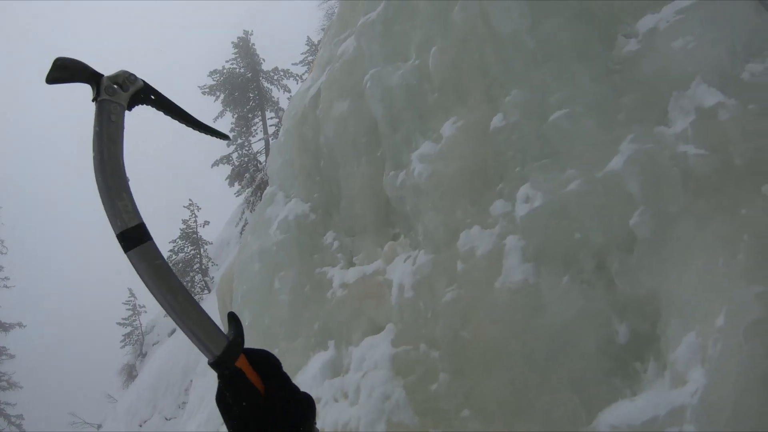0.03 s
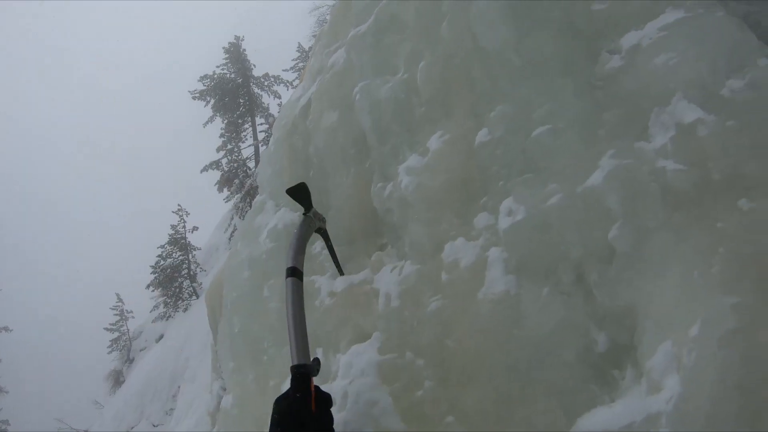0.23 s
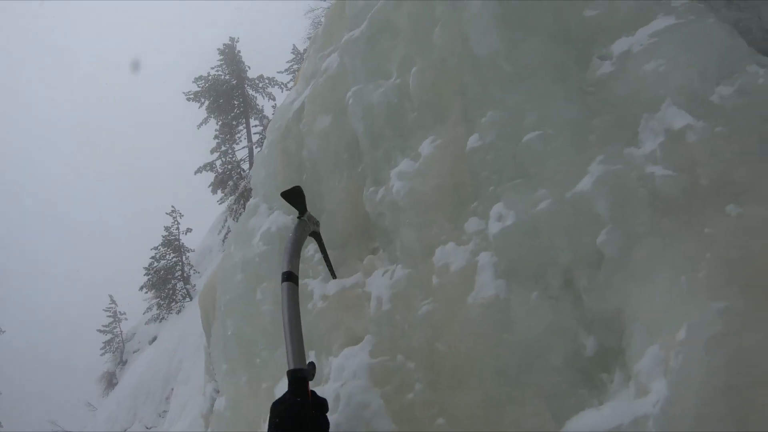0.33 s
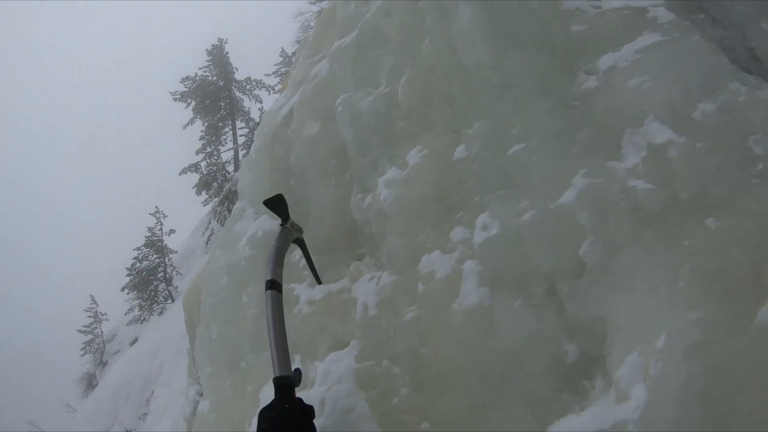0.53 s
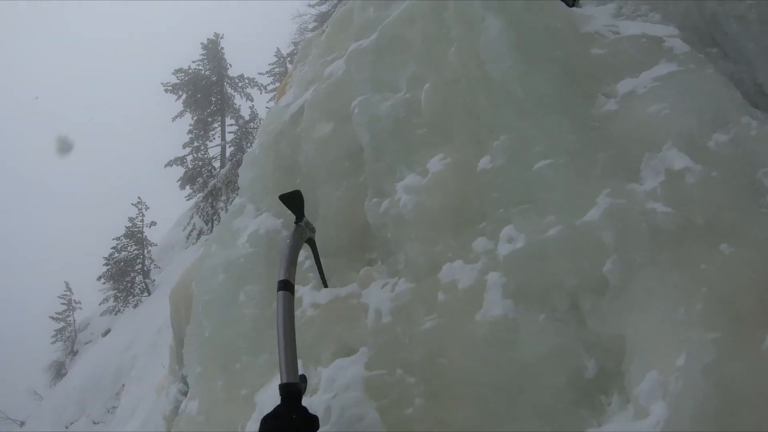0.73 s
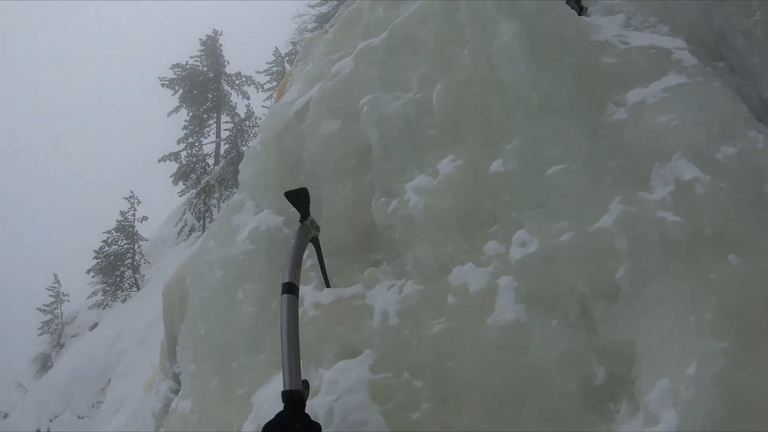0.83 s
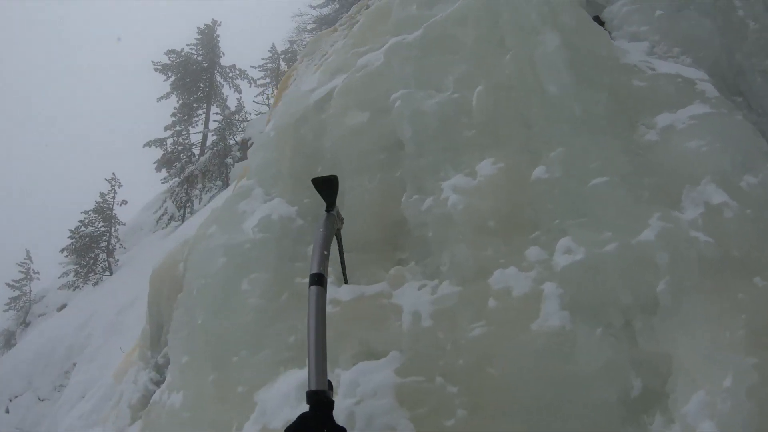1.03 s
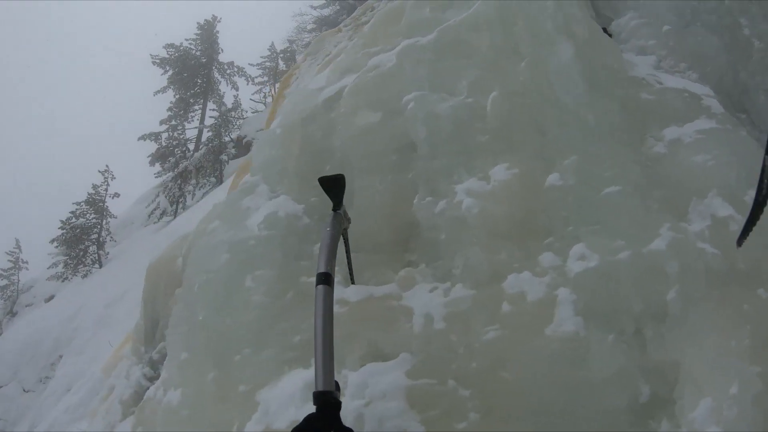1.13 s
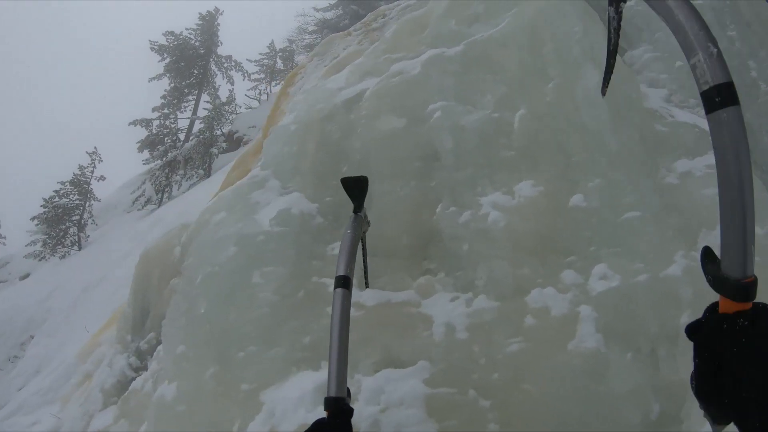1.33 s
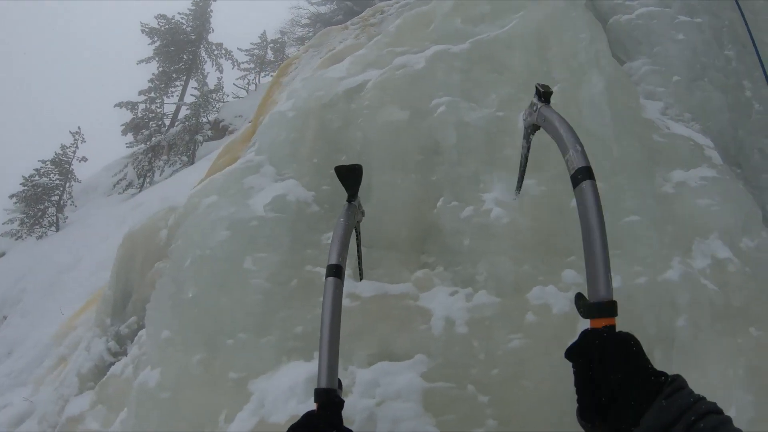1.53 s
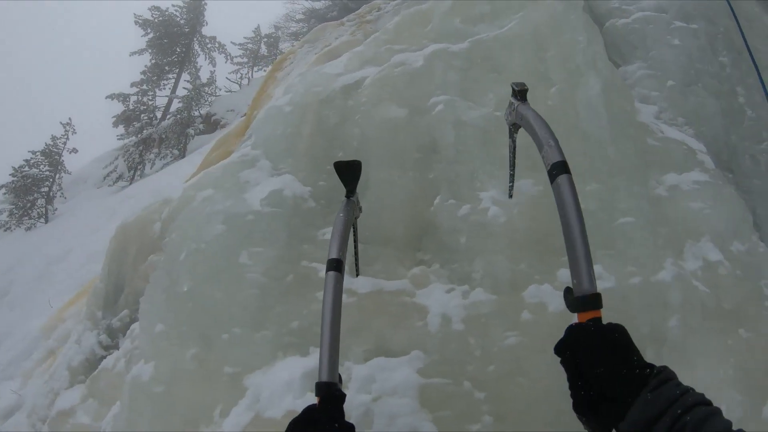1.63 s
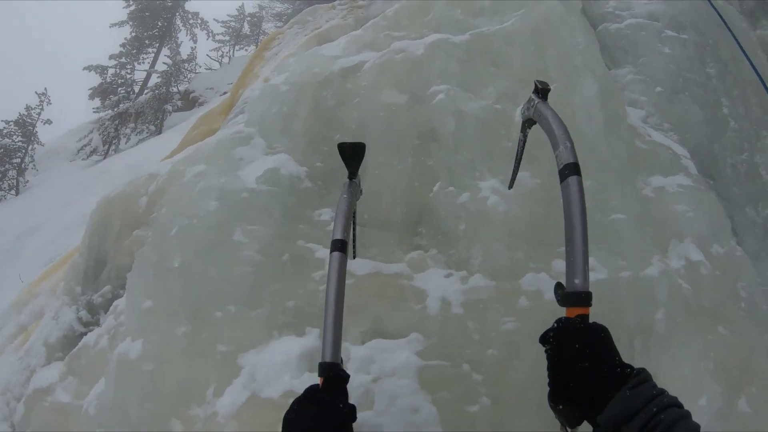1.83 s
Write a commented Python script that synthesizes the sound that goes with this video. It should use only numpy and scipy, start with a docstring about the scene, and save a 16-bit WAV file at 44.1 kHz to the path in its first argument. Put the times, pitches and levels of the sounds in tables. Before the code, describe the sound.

Two ice axes strike a frozen wall outdoors, an arm's length away. The first crunches in with a thud, the ice crackles faintly and clothing rustles softly, then the second bites with a brief steel ring.

```python
"""Two ice axes in a frozen waterfall

A climber plants two axes, an arm's length away. The left pick crunches in through several fractures;
the right one bites at once and its steel rings briefly. Each time, the wall thuds and booms as the
shaft stops, and crushed ice settles. Between the blows the ice crackles under the loaded pick,
shifts of weight knock softly, and stiff clothing rustles with each move."""
import sys
import numpy as np
from scipy import signal
from scipy.fft import rfft, irfft
from scipy.io import wavfile
from scipy.ndimage import uniform_filter1d

SR = 44100
rng = np.random.default_rng(int(sys.argv[2]) if len(sys.argv) > 2 else 0)


def generate_wav(sig):
    """Save sig (samples, or channels by samples) to the path in sys.argv[1] as 16-bit PCM at SR."""
    pcm = np.round(np.clip(np.atleast_2d(sig).T, -1, 1) * 32767).astype(np.int16)
    wavfile.write(sys.argv[1], SR, pcm)


N = 83790

# tone of the still air, the rubbing cloth and its hiss (frequency [Hz], level [dB])
AIR_TONE = [(15, -7), (40, -5), (90, -14.5), (300, -19.5), (2000, -30), (15000, -45.5)]
RUB_TONE = [(30, -24.5), (90, -23.5), (170, -0.5), (450, -0.5), (900, -0.5), (1700, 2.5), (2600, -0.5),
            (3400, -0.5), (4500, -13), (8000, -30), (15000, -39.5)]
HISS_TONE = [(100, -38.5), (1500, -13), (3300, -3.5), (5000, -1.5), (7300, 4.5), (9200, 0), (10500, -18),
             (14000, -21), (16000, -36)]
# how loud the clothing is (time [s], rub level [dB], hiss level [dB])
RUSTLE_LEVELS = [(0, -63, -64), (.1, -66.5, -66), (0.212, -71, -69.5), (0.23, -47, -60), (.30, -70, -70.5),
                 (.345, -78.5, -68), (.41, -64.5, -62.5), (.48, -71.5, -66), (.68, -72, -66),
                 (0.744, -62, -58), (.785, -72, -65.5), (.87, -69, -65), (0.949, -69, -63.5),
                 (0.999, -77.5, -74.5), (1.131, -79, -69.5), (1.179, -68.5, -69.5), (1.271, -63, -65),
                 (1.319, -70.5, -72.5), (1.429, -69, -65), (1.49, -75.5, -70), (1.552, -74, -65),
                 (1.587, -52.5, -71.5), (1.64, -81.5, -70), (1.699, -77.5, -76), (1.724, -68.5, -62),
                 (1.77, -60.5, -63), (1.82, -71, -71.5), (1.87, -77, -72.5), (1.9, -69, -69.5)]
# a sleeve drags (peak time [s], half length [s], level [dB], pitch [Hz], resonance width [Hz])
SLEEVE_DRAGS = [(0.888, 0.053, -75, 214, 60), (1.312, 0.066, -74, 185, 70), (1.43, 0.052, -68, 2900, 900),
                (1.54, 0.03, -70.5, 3480, 500), (1.797, 0.038, -67.5, 321, 90)]

# knocks: weight shifts, crushed ice settles, the wall takes a blow and then shudders
# (time [s], length [s], level [dB], fade time [s])
WEIGHT_BUMPS = [(.457, 0.0077, -67.5, 0.0027), (.555, .006, -65, 0.0072), (.611, 0.013, -62.5, 0.0062),
                (.72, 0.0059, -66, 0.0072), (1.362, 0.0098, -62, 0.0087), (1.884, .012, -67, 0.0062)]
GRIT_BURSTS = [(.253, 0.023, -46, 0.0049), (1.598, 0.0014, -37.5, 0.0045), (1.61, 0.0024, -72, 0.027)]
WALL_THUDS = [(.232, .008, -44, 0.0075), (.2435, .006, -30, 0.0034), (.279, 0.0029, -44, 0.0056),
              (1.595, 0.0023, -34, 0.0031), (1.605, .004, -56, 0.0141)]
WALL_SHUDDERS = [(.246, .008, -51, .006), (1.6, 0.018, -59.5, 0.026)]
# tone of each kind of knock (frequency [Hz], level [dB])
BUMP_TONE = [(30, -27), (90, -16.5), (170, 3.5), (250, -3.5), (380, -1.5), (600, -5.5), (780, -2),
             (1200, -16), (4000, -33), (10000, -46)]
GRIT_TONE = [(100, -7.5), (600, 5.5), (1100, -3.5), (1800, 1.5), (2500, 8), (3500, -5.5), (5000, -9.5),
             (8500, -6.5), (11000, -29), (16000, -38.5)]
THUD_TONE = [(25, -18.5), (60, -6.5), (110, -4), (200, -3.5), (320, -11.5), (470, 0.5), (630, -19),
             (750, -4.5), (950, -15), (1600, -20.5), (4000, -64.5)]
SHUDDER_TONE = [(15, -8), (40, 3), (75, -1), (130, -1.5), (220, -14.5), (600, -46), (2000, -82.5)]

# ice cracks under load and a chip rings (time [s], length [s], level [dB], treble [dB], chip pitch [Hz])
LOAD_CRACKS = [(0.1705, 0.00072, -70, 18, 5960), (0.3557, 0.0016, -67, 11.5, 6700),
               (.457, 0.0055, -57, -23, 3420), (.556, 0.0027, -47.5, 0.5, 2490),
               (0.564, 0.0011, -53, -1, 3100), (0.588, 0.00082, -53, -4, 3530),
               (.5962, 0.0021, -51, -7, 3290), (.609, 0.0051, -55, -23, 3200),
               (0.618, 0.0015, -53.5, -15, 2460), (0.6193, 0.0054, -53.5, -18, 1830),
               (0.65, 0.0028, -61, 5, 3170), (0.722, 0.0027, -55, -17, 3520),
               (0.7372, 0.0074, -48, -6.5, 2950), (.748, 0.0003, -40.5, -0.5, 3400),
               (0.763, 0.0017, -59, 5.5, 3500), (0.795, 0.0024, -65, 10, 4630),
               (.81, .002, -71, 14.5, 7400), (0.827, 0.00075, -64, 10, 5600),
               (0.8305, 0.00059, -64, 14, 3310), (0.8506, 0.001, -57.5, 6.5, 3400),
               (.858, 0.0039, -55, 4, 3400), (0.866, 0.00087, -70, 10, 5600),
               (.878, 0.0018, -48, -17, 3640), (1.033, 0.00089, -74, 10, 7100),
               (1.848, 0.00089, -70, 6, 6300)]
# tone of those small cracks (frequency [Hz], level [dB])
CRACKLE_TONE = [(100, -21), (500, -11), (1200, -13.5), (1900, 4), (2300, -1), (3300, 0), (4500, -5),
                (6500, -1), (9000, -4), (11000, -23.5), (15500, -37.5)]

# each blow rings (time [s], bite level [dB], steel level [dB])
BLOW_RINGS = [(.2365, -35, -58.5), (1.5952, -42.5, -44)]
# the wall booms (time [s], level [dB], multiplier on the wall's ring times)
WALL_BOOMS = [(.2465, -30.5, 0.95), (1.5981, -35, 0.53)]
# brief, bright ringing tones of the pick biting into the ice, and the higher ring of its steel
# (pitch [Hz], level [dB], time to fade by 60 dB [s])
BITE_NOTES = [(1968, -7, .06), (2627, -7, .06), (2856, -2, .07), (2975, -3, .06), (3330, 6, .03),
              (3483, -1, .06)]
STEEL_NOTES = [(6520, -9.5, .085), (7100, 1, 0.14), (7150, -11.5, .07)]
# natural notes of the wall (pitch [Hz], level [dB], ring time before the multiplier [s])
WALL_NOTES = [(37.5, -23.5, 0.28), (67.4, -22, 0.11), (154.2, -12, 0.11), (208, -2.5, .065),
              (454, 3.5, 0.057), (753.6, -0.5, 0.058)]

# fractures under each pick (time [s], length [s], level [dB], treble [dB], right minus left [dB])
LEFT_FRACTURES = [(.2318, 0.0034, -28.5, -1.5, 5), (.2361, 0.00076, -22.5, 3, 1.5),
                  (.2384, 0.0019, -22.5, -1, 4.5), (.2443, 0.0016, -24, 2.5, 2),
                  (.2468, .002, -26.5, -1, -1), (.2525, 0.0028, -33, -5.5, 1.5), (.2637, .002, -28, -7, -3),
                  (.2663, 0.00089, -29, -1, 1.5), (.2715, 0.0018, -33, 3.5, 2), (.2759, 0.0016, -32, -2, 2),
                  (.2795, 0.0064, -49, -11.5, 2)]
RIGHT_FRACTURES = [(1.5893, .0012, -29, -1.5, 15), (1.5907, .0017, -21, 4, 1),
                   (1.5952, .0018, -17, -12.5, 3.3)]
# tone of the ice and axe at each spot (frequency [Hz], level [dB])
LEFT_TONE = [(100, -22.5), (600, -19), (1150, -23), (1550, -10), (1930, -0.5), (2300, -8), (2650, -4.5),
             (2950, 4), (3200, -6), (3500, 0.5), (4000, -16.5), (4450, -5.5), (5200, -9.5), (6500, -11),
             (8800, -11.5), (10500, -36.5), (14000, -47.5), (16000, -42)]
RIGHT_TONE = [(100, -31), (700, -16), (1150, -15.5), (1500, -11.5), (1900, -14), (2350, -2.5), (2850, -8.5),
              (3350, 6), (3700, -9.5), (4100, -6), (4800, -22), (5500, -13), (6250, -4.5), (7500, -19),
              (8800, -13), (9700, -30.5), (14500, -46), (16000, -49)]
# which side each blow leans to (frequency [Hz], right minus left [dB])
LEFT_BALANCE = [(500, 9.5), (2000, -2), (5000, -0.5), (9000, 0), (14000, -4)]
RIGHT_BALANCE = [(500, -3.5), (1300, 9), (2400, -2.5), (3400, 5), (5000, -2.5), (6300, -5.5), (7500, -17),
                 (8800, 6.5), (14000, -1)]
# how far the left microphone lags the right (frequency [Hz], phase [radians])
MIC_LAG = [(3400, 0.13), (5400, 0.97), (7300, 2.24), (8600, 3.5), (10500, 0.4), (15000, 1.793)]


def amp(db):
    """Turns decibels into a number to multiply by."""
    return 10 ** (np.asarray(db) / 20)


def unit(x):
    """Scales a signal to an average power of 1."""
    return x / np.sqrt(np.mean(x ** 2) + 1e-20)


def look_up(points, hz):
    """Reads between a table's rows on a logarithmic frequency scale."""
    frequencies, values = np.transpose(points)
    return np.interp(np.log(hz + 1), np.log(frequencies + 1), values)


def add(mix, start, sound):
    """Mixes a sound in at a start time in seconds."""
    part = mix[:, round(start * SR):][:, :sound.shape[-1]]
    part += sound[..., :part.shape[1]]


def pan(db):
    """Left and right gains that make the right side louder by db."""
    return amp(np.array([[-.5], [.5]]) * db)


def stereo(a, b, likeness):
    """Blends two noises into left and right: likeness 0 is unrelated, 1 is identical."""
    return np.sqrt((1 + likeness) / 2) * a + np.sqrt((1 - likeness) / 2) * np.array([b, -b])


def colour(x, tone, balance=None, size=8192):
    """Filters a sound to a tone table and, if given, a left-right balance table."""
    hz = abs(np.fft.fftfreq(size, 1 / SR))
    gain = unit(amp(look_up(tone, hz))) * pan(look_up(balance, hz) if balance else 0)
    # this phase keeps the filter from sounding before it is struck
    response = np.exp(np.conj(signal.hilbert(np.log(gain + 1e-6))))
    taps = np.fft.ifft(response).real[:, :size // 2] * np.hanning(size)[size // 2:]
    return signal.oaconvolve(x, taps, axes=1)[:, :N]


def resonate(x, hz, width_hz):
    """A resonance: lets through the sound near one pitch."""
    decay = np.exp(-np.pi * width_hz / SR)
    return 2 * signal.lfilter([1 - decay], [1, -decay * np.exp(2j * np.pi * hz / SR)], x).real


def burst(length, rise_s, fade_s, size=8192):
    """A short spray of tiny cracks that rises, holds and fades."""
    t = np.arange(size) / SR
    shape = np.minimum(t / rise_s, 1) * np.exp(-np.maximum(t - length, 0) / fade_s)
    spray = rng.standard_normal(size) * shape
    for _ in range(3):  # even out the frequencies, then restore the shape in time
        spectrum = rfft(spray)
        spray = irfft(spectrum / (abs(spectrum) + 1e-12))
        spray = shape * spray / np.sqrt(abs(uniform_filter1d(spray ** 2, 64)) + 1e-14)
    return spray


def still_air(level_db=-89):
    """A very faint, low, steady hush."""
    return amp(level_db) * colour(stereo(*rng.standard_normal((2, N)), likeness=0.27), AIR_TONE)


def clothing(grains_per_s=700, grain_spread_db=4.5, grain_db=-0.5, flutter_db=1.52):
    """Stiff fabric rubs and hisses with each move, with fine grains of frost in it."""
    times, rub_db, hiss_db = np.transpose(RUSTLE_LEVELS)
    t = np.arange(N) / SR
    rub = stereo(*rng.standard_normal((2, N)), likeness=0.22)
    hiss = stereo(*rng.standard_normal((2, N)), likeness=0.085)
    slow_noise = uniform_filter1d(uniform_filter1d(rng.standard_normal(N), 300), 200)
    grain_hits = rng.random(N) < grains_per_s / SR
    grain_sizes = amp(grain_spread_db * np.minimum(rng.exponential(1, N), 4))
    grains = grain_hits * grain_sizes * rng.choice([-1, 1], N)
    grains = unit(grains * pan(6 * rng.standard_normal(N)))  # each grain has its own direction
    frosty_hiss = unit(hiss + amp(grain_db) * grains)
    rub = colour(rub, RUB_TONE) * pan(db=5) * amp(np.interp(t, times, rub_db))
    hiss = colour(frosty_hiss, HISS_TONE) * pan(db=2) * amp(np.interp(t, times, hiss_db))
    return amp(flutter_db * unit(slow_noise)) * (rub + hiss)


def sleeve_drags():
    """Fabric slides over itself and swells into a hollow or raspy note."""
    out, t = np.zeros((2, N)), np.arange(N) / SR
    for peak, half_length, db, hz, width_hz in SLEEVE_DRAGS:
        friction = stereo(*rng.standard_normal((2, N)), likeness=0.37)
        note = resonate(resonate(friction, hz, width_hz), hz, width_hz)
        out += amp(db) * np.exp(-((t - peak) / half_length) ** 2) * unit(note)
    return pan(db=2) * out


def knocks(rows, tone, rise_s, pan_db):
    """Short bursts take on the tone of whatever is knocked: a bump, a thud or a gritty crunch."""
    out = np.zeros((2, N))
    for start, length, db, fade_s in rows:
        add(out, start, amp(db) * burst(length, rise_s, fade_s))
    return pan(pan_db) * colour(out, tone)


def crack(length, treble_db, likeness, fade_s, scatter_db):
    """Ice breaks: one snap inside a spray of tiny cracks, then loose chips and echoes off the wall."""
    rise_s, snap_db, scatter_fade_s, treble_hz = .0004, -5.5, 0.014, 4360
    spray = stereo(burst(length, rise_s, fade_s), burst(length, rise_s, fade_s), likeness)
    spray[:, round(.3 * length * SR)] += amp(snap_db) * np.linalg.norm(spray[0])  # the snap, 30% in
    t = np.arange(spray.shape[1]) / SR
    scatter_shape = np.minimum(t / length, 1) * np.exp(-t / scatter_fade_s)
    scatter = scatter_shape * stereo(*rng.standard_normal(spray.shape), likeness * 0.68)
    sound = spray / np.hypot(1, amp(snap_db)) + amp(scatter_db) * scatter
    treble = signal.sosfilt(signal.butter(1, treble_hz, "high", fs=SR, output="sos"), sound)
    return sound + (amp(treble_db) - 1) * treble


def crackling(chip_db=10):
    """Small cracks round the loaded pick, each with the brief tinkle of one chip."""
    out = np.zeros((2, N))
    for start, length, db, treble_db, chip_hz in LOAD_CRACKS:
        snap = crack(length, treble_db, likeness=0.31, fade_s=0.0015, scatter_db=-15)
        tinkle = amp(chip_db) * resonate(snap, chip_hz, width_hz=170)
        add(out, start, amp(db) * (snap + tinkle))
    return pan(db=1) * colour(out, CRACKLE_TONE)


def ring(notes, rise_s):
    """A few pure tones start together, and each dies away at its own rate."""
    t = np.arange(SR // 3) / SR
    sound = np.zeros_like(t)
    for hz, db, ring_s in notes:
        fade = np.exp(-np.log(1000) * t / ring_s)
        sound += amp(db) * fade * np.sin(2 * np.pi * (hz * t + rng.random()))
    return np.minimum(t / rise_s, 1) * sound


def ringing():
    """The pick bites with brief, bright tones and its steel rings; the wall booms under them."""
    out = np.zeros((2, N))
    for start, bite_db, steel_db in BLOW_RINGS:
        add(out, start, amp(bite_db) * pan(db=-1) * ring(BITE_NOTES, rise_s=0.00099))
        add(out, start, amp(steel_db) * pan(db=-2) * ring(STEEL_NOTES, rise_s=0.0011))
    for start, db, multiplier in WALL_BOOMS:
        notes = [(hz, level, ring_s * multiplier) for hz, level, ring_s in WALL_NOTES]
        add(out, start, amp(db) * pan(db=2) * ring(notes, rise_s=0.0011))
    return out


def pick_strike(fractures, tone, balance, likeness, fade_s, scatter_db):
    """A pick breaks its way in; the ice and the axe give each fracture its tone."""
    out = np.zeros((2, N))
    for start, length, db, treble_db, pan_db in fractures:
        add(out, start, amp(db) * pan(pan_db) * crack(length, treble_db, likeness, fade_s, scatter_db))
    return colour(out, tone, balance)


def scene():
    """Two blows, the crackling between them, the climber's movements and still air."""
    left = pick_strike(LEFT_FRACTURES, LEFT_TONE, LEFT_BALANCE,
                       likeness=0.85, fade_s=0.0014, scatter_db=-18)
    right = pick_strike(RIGHT_FRACTURES, RIGHT_TONE, RIGHT_BALANCE,
                        likeness=0.95, fade_s=0.00086, scatter_db=-35.5)
    grit = knocks(GRIT_BURSTS, GRIT_TONE, rise_s=0.0022, pan_db=10)
    thuds = knocks(WALL_THUDS, THUD_TONE, rise_s=0.0039, pan_db=2)
    shudders = knocks(WALL_SHUDDERS, SHUDDER_TONE, rise_s=.004, pan_db=3.5)
    bumps = knocks(WEIGHT_BUMPS, BUMP_TONE, rise_s=0.0021, pan_db=4)
    blows = left + right + grit + thuds + shudders
    return still_air() + crackling() + blows + ringing() + bumps + clothing() + sleeve_drags()


def record(dry, cutoff_hz=15800):
    """The two microphones fall out of step in the treble, and the very highest sounds are cut."""
    hz = np.fft.rfftfreq(2 * N, 1 / SR)
    lag = np.interp(hz, *np.transpose([(0.018, 0.0062)] + MIC_LAG))
    phase_shift = np.exp(1j * np.array([[-.5], [.5]]) * lag)
    mics = irfft(rfft(dry, 2 * N) * phase_shift)[:, :N]
    low_pass = signal.firwin(511, cutoff_hz, window=("kaiser", 9), fs=SR)
    return signal.oaconvolve(mics, low_pass[None], "same")


dry = scene()
out = record(dry)
generate_wav(out)
```